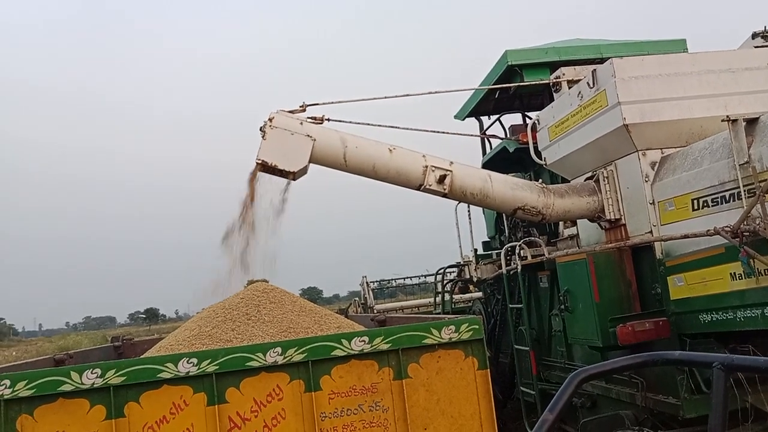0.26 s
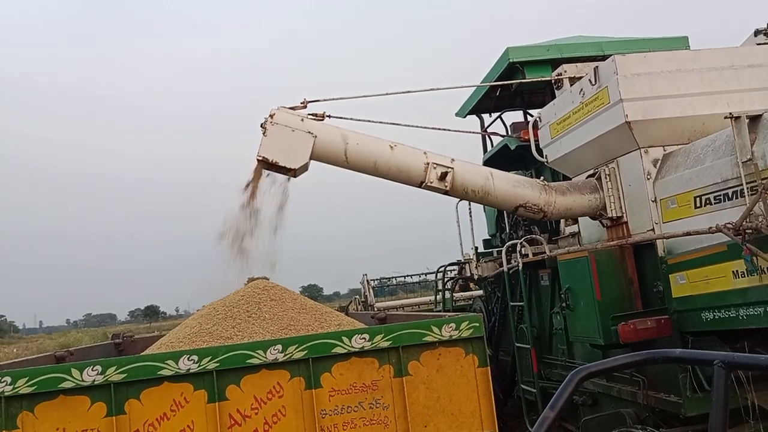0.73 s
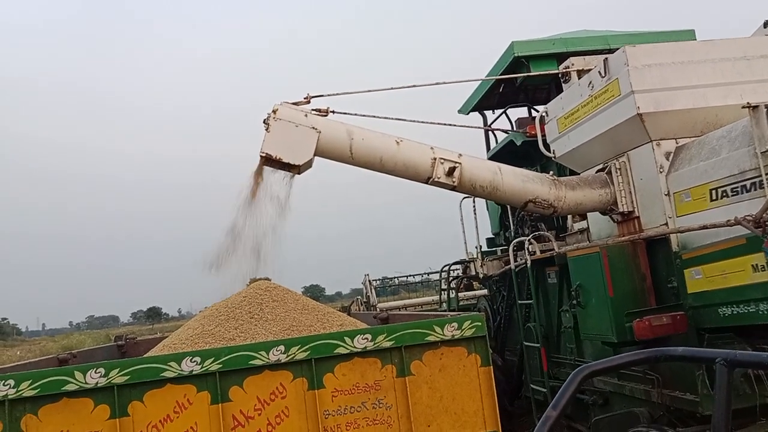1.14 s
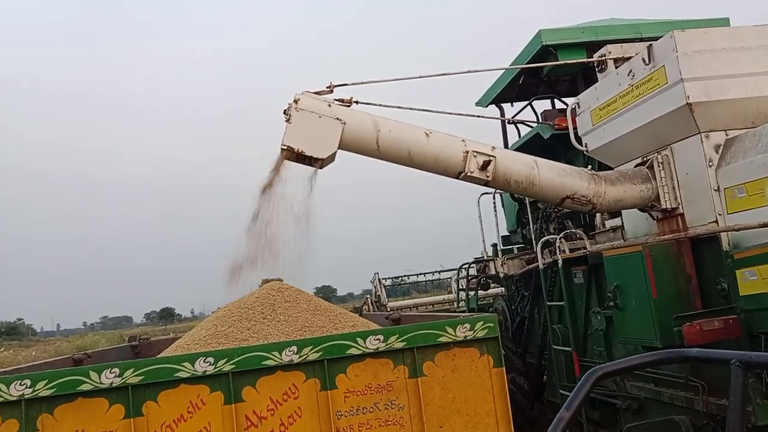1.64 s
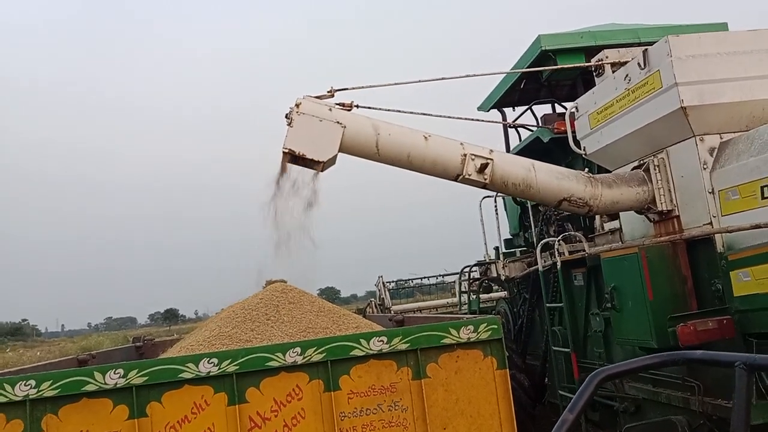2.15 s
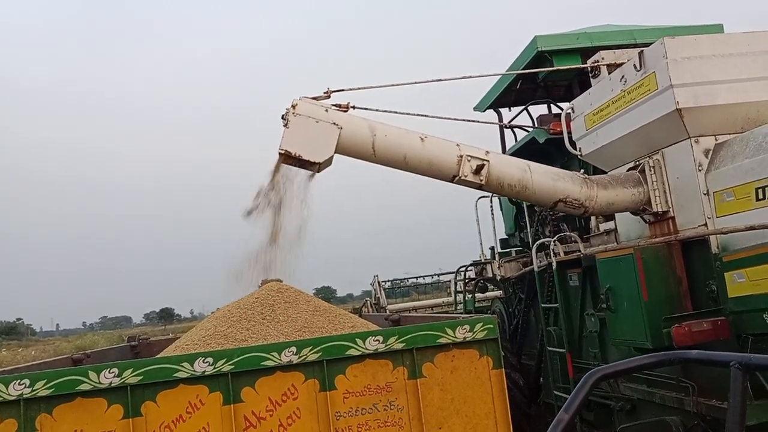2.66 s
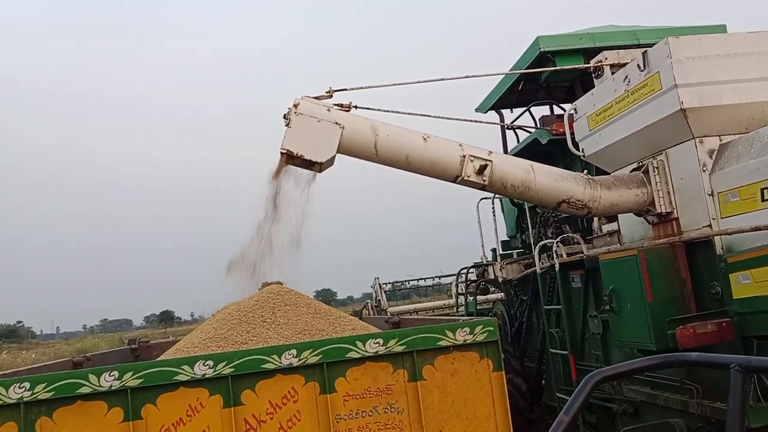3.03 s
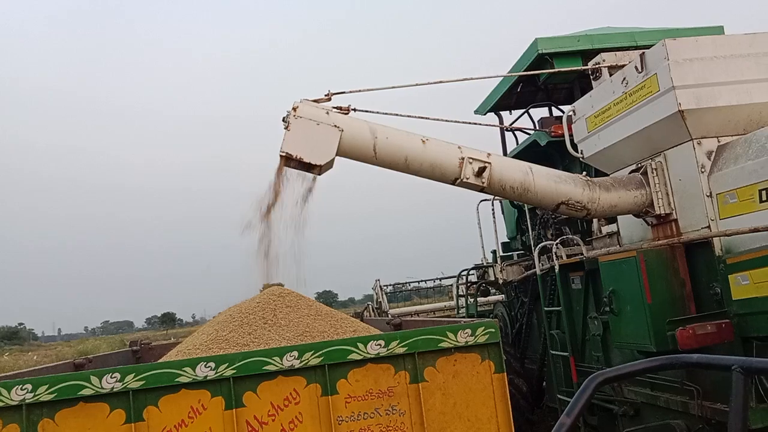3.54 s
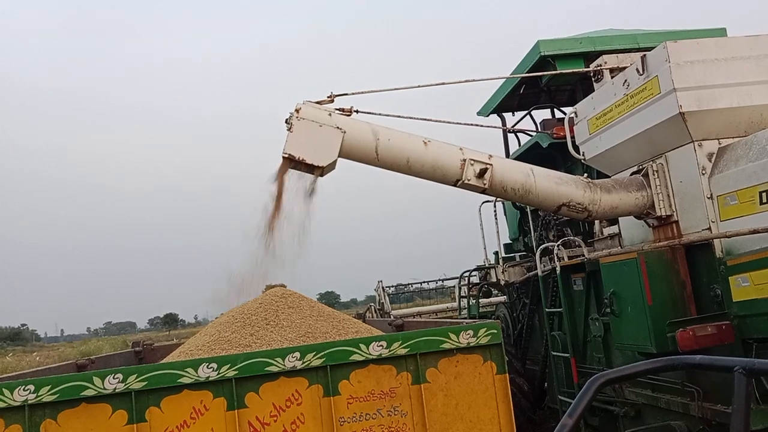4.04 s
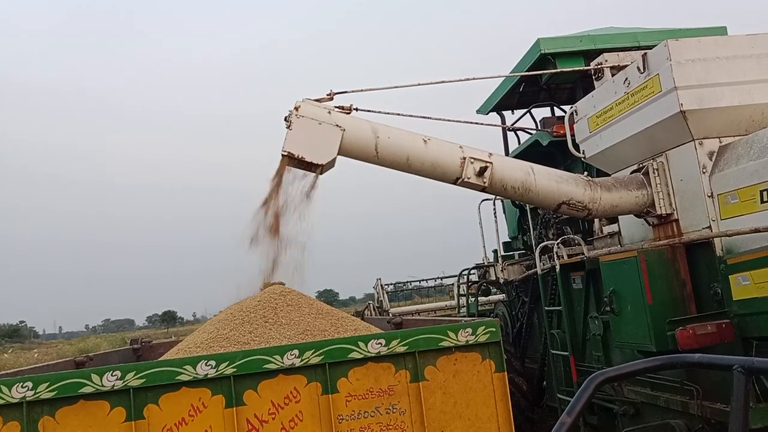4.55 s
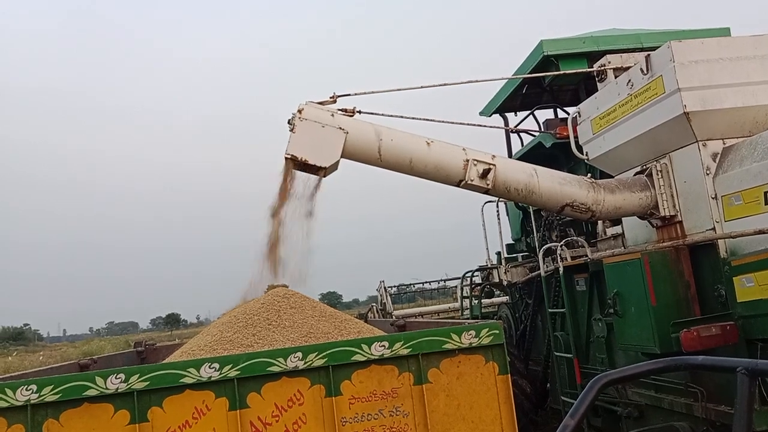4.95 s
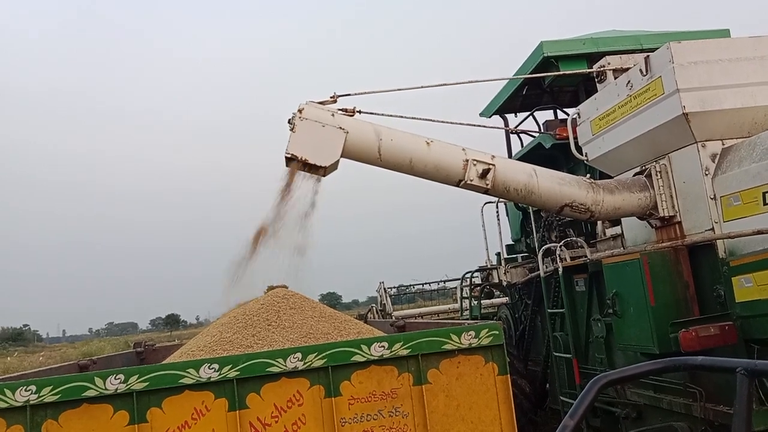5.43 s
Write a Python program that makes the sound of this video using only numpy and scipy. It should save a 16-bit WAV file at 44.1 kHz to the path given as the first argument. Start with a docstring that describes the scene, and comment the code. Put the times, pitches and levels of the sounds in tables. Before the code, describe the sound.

A combine harvester unloads grain into a trailer in an open field, heard from a few metres away for about 5.7 seconds. Its engine drones low throughout, a rough hum wavering slightly in pitch and level, with rumbling pipe and thin sheet-metal panels. Over it the auger rubs its steel tube about eight times a second, a quick dull rattle with a steady grainy scrape. Harder, briefly ringing knocks with small rebounds come irregularly: several from 0.6 to 1.4, more around 1.9 to 2.5 with the strongest near 2.4 and 2.5, a lull until 3.5, then scattered clanks, including 5.0 and a strong one at 5.5. Kernels pour in a dense, bright, fluttering hiss, swelling gently with each turn. Small spurts stand out near 3.0 and 3.9, and faint pings near 1.6 and 2.5. The microphone is fixed and dry, its peaks softened and upper midrange hollow. Everything continues to the end.

```python
"""A combine harvester stands in a field and unloads grain into a trailer, heard from one spot a few metres away.
Its drone is exhaust and shaft tones on one wavering speed, over random thumps through pipe and sheet metal.
The auger flight rubs its steel tube about eight times a second, and knocks hard at listed times: filtered
blows and chatter ring the tube's modes, over a steady scrape of dragged grain.
Kernels hiss down the spout and onto the heap as dense random ticks, with a few spurts and pings."""
import sys
import numpy as np
from scipy import signal
from scipy.fft import rfft, irfft, next_fast_len
from scipy.io import wavfile
from scipy.ndimage import uniform_filter1d

SR = 44100
rng = np.random.default_rng(int(sys.argv[2]) if len(sys.argv) > 2 else 0)


def dump_mix(stems):
    """Bounce the given channels to the path in sys.argv[1] as a 16-bit WAV at rate SR."""
    frames = np.atleast_2d(stems).T  # one column per channel
    limited = np.clip(frames, -1, 1)  # hard clip at full scale
    pcm = np.round(limited * 32767).astype(np.int16)
    wavfile.write(sys.argv[1], SR, pcm)


N = 250929
TIME = np.arange(N) / SR  # s

AUGER_HZ = 8.11  # turns a second
FIRST_RUB_S, RUB_S = 0.0655, 0.034  # the flight brushes the wall once a turn, for this long


def undb(db):
    """Decibels to gain."""
    return 10 ** (np.asarray(db) / 20)


def unit(x):
    """Scale to rms 1."""
    return x / np.sqrt(np.mean(x ** 2) + 1e-18)


def curve(table):
    """Join (s, value) rows by straight lines."""
    return np.interp(TIME, *np.transpose(table))


def walk(rate):
    """Smooth random wander with rms 1, from rate random steps a second averaged twice."""
    k = max(int(SR / rate), 1)
    steps = np.repeat(rng.standard_normal(N // k + 2), k)
    smooth = uniform_filter1d(uniform_filter1d(steps, k), k)
    return unit(smooth[:N])


def clumps(rate):
    """Unevenness of a lumpy stream, rms 1: clumps arrive at once, rate a second, and each trails off."""
    fade_s = 0.022
    arrivals = (rng.random(N) < rate / SR) * 1.0
    amount = signal.lfilter([1], [1, -np.exp(-1 / (fade_s * SR))], arrivals)
    return unit(amount - amount.mean())


def impacts(rate, scatter_db):
    """Random tiny blows of either sign and uneven size, rate a second, scaled to rms 1."""
    hit = rng.random(N) < rate / SR
    sign = np.sign(rng.standard_normal(N))
    size = undb(scatter_db * rng.standard_normal(N))
    return unit(hit * sign * size)


def burst(start, length, rise, fall):
    """Envelope that builds over rise (s), holds for about its length (s) and lets go as a power of age."""
    age = np.maximum(TIME - start, 0)
    return (1 - np.exp(-age / rise)) / np.sqrt(1 + (age / length) ** fall)


def colour(x, points):
    """Causal minimum-phase filter with a response through (Hz, dB) points on a log frequency axis."""
    size = next_fast_len(N + SR // 2, real=True) // 2 * 2
    hz, db = np.transpose(points)
    freq = np.maximum(np.arange(size // 2 + 1) * SR / size, 1)
    gain = undb(np.interp(np.log(freq), np.log(hz), db))
    # folding the cepstrum onto positive time makes the filter causal
    cepstrum = irfft(np.log(gain))
    cepstrum[1:size // 2] *= 2
    cepstrum[size // 2 + 1:] = 0
    response = np.exp(rfft(cepstrum))
    return irfft(rfft(x, size) * response)[:N]


def drone():
    """Exhaust and shaft tones share one wavering speed, over firing-pulsed thumps in the pipe and panels."""
    # exhaust note: multiple of the firing rate, level_db (within the hum)
    exhaust = [(1, -17.5), (2, -11.5), (3, -22), (4, -17)]
    # belt-driven shafts and fan: pitch_hz (before the wander), level_db (within the hum)
    shafts = [(44, -44), (57.3, -27), (86, -18.5), (142.5, -17.5), (153, -18.5), (194.5, -16)]
    # response of the exhaust pipe: freq_hz, gain_db
    pipe = [(22, -43.5), (36, -45), (56, -11.5), (72, -3), (85, 0.5), (102, 4), (120, -2.5), (150, -6),
            (300, -54), (2000, -71)]
    # response of the sheet-metal panels: freq_hz, gain_db
    body = [(40, -52.5), (100, -12.5), (128, -2.5), (150, 2.5), (178, -2), (197, 0.5), (240, -2),
            (300, -1.5), (314, -8.5), (330, -6), (360, -7.5), (485, -12.5), (560, -22.5), (5000, -59)]
    firing_hz = 82  # before the wander
    speed_wander, flutter_db = 0.00893, 3.5  # rms: fraction of speed, dB of each tone

    seconds_turned = np.cumsum(1 + speed_wander * walk(6)) / SR
    hum = np.zeros(N)
    for hz, db in [(k * firing_hz, db) for k, db in exhaust] + shafts:
        level = undb(db + flutter_db * walk(14))
        hum += level * np.sqrt(2) * np.sin(2 * np.pi * (hz * seconds_turned + rng.random()))

    firing = 1 + 0.087 * np.cos(2 * np.pi * firing_hz * seconds_turned)
    boom = unit(colour(firing * impacts(rate=1700, scatter_db=-2), pipe))
    panels = unit(colour(firing * impacts(rate=1800, scatter_db=0.5), body))
    # the whole drone throbs slightly with the auger
    throb_db = 0.35 * np.cos(2 * np.pi * AUGER_HZ * (TIME - 0.018))
    return undb(throb_db) * (undb(-1.5) * hum + undb(-9.5) * boom + undb(-0.5) * panels)


def auger(flow_db):
    """The flight's contacts clatter and ring the tube while it drags the grain along."""
    # dull clatter of a contact: freq_hz, gain_db
    clatter_response = [(100, -46), (550, -11.5), (720, -3.5), (1000, -2.5), (1250, 2.5), (1550, -12),
                        (2300, -15), (3200, -21), (4200, -19), (6000, -24.5), (10000, -64)]
    # response of grain dragged along the tube: freq_hz, gain_db
    scrape_response = [(250, -9.5), (480, 2.5), (570, -3), (720, 3), (1000, 1), (1320, -1.5), (1520, -9.5),
                       (1750, -10.5), (2000, -7.5), (2600, -9.5), (2900, -16), (3300, -16), (4200, -37.5),
                       (7000, -38)]
    scrape_db = -24.5  # gain at flow 0 dB
    scrape_per_flow = 0.94  # dB of scraping for each dB of flow

    blows, chatter = contacts()
    ringing = tube(undb(-8) * blows + undb(-13) * chatter)
    clatter = undb(1.5) * colour(undb(-3.5) * blows + chatter, clatter_response)

    drag = unit(colour(impacts(rate=2200, scatter_db=2.5), scrape_response))
    rattle = tube(impacts(rate=700, scatter_db=1.5))
    scrape = undb(-0.76) * drag + undb(-9) * rattle
    scrape_gain = undb(scrape_db + scrape_per_flow * flow_db + 1.0 * clumps(rate=52))
    return ringing + clatter + scrape_gain * scrape


def contacts():
    """Forces of the flight on the wall: hard rebounding blows, and chatter in each rub or knock."""
    # hard knocks of the flight on its tube: start_s, level_db (of the chatter's force), chatter_s
    knocks = [(.563, -14.5, .028), (.677, -12.5, 0.014), (0.887, -12, .014), (1.05, -12.5, 0.022),
              (1.304, -7, 0.015), (1.438, -11, .041), (1.917, -12, 0.044), (2.049, -9.5, 0.014),
              (2.283, -10, 0.027), (2.423, -4.5, .02), (2.54, -5, 0.023), (3.516, -11.5, 0.033),
              (3.637, -9.5, .02), (3.756, -10, 0.018), (4.136, -12.5, .027), (4.495, -13, .025),
              (4.746, -11.5, .035), (4.888, -14, 0.035), (5.015, -8, .018), (5.327, -13, 0.049),
              (5.512, -5.5, 0.032)]
    rub_db, rub_scatter_db, rub_jitter_s = -18.5, 0.1, 0.004
    contact = dict(rise=0.00042, fall=3.1)  # s, exponent
    strike_db = 19.5  # force of the first blow, re the knock's level
    bounce_s, bounce_db = 0.011, -4  # mean gap and weakening of each of two rebounds

    pressure, blows = np.zeros(N), np.zeros(N)
    for turn_s in np.arange(FIRST_RUB_S, N / SR, 1 / AUGER_HZ):
        late, strong = rng.standard_normal(2)
        rub = burst(turn_s + rub_jitter_s * late, RUB_S, **contact)
        pressure = np.maximum(pressure, undb(rub_db + rub_scatter_db * strong) * rub)

    for start, db, length in knocks:
        pressure = np.maximum(pressure, undb(db) * burst(start, length, **contact))
        gaps = bounce_s * (0.5 + rng.random(2))
        for k, at in enumerate([start, start + gaps[0], start + gaps.sum()]):
            blows[int(at * SR)] = undb(db + strike_db + k * bounce_db)
    return blows, pressure * impacts(rate=2400, scatter_db=0.5)


def tube(x):
    """Ring the steel tube's decaying modes; their summed response has unit energy."""
    # modes: pitch_hz, t60_s (time to fall 60 dB), level_db (relative, evened out for decay time)
    modes = [(633, 0.2, -4.5), (711.4, 0.11, 1), (822, 0.078, -1.5), (898, 0.18, 1.5), (988, 0.078, 4),
             (1091, 0.094, 3), (1248, 0.098, -5.5), (1320, 0.11, 2), (1380, 0.29, -8), (1703, 0.14, -9.5),
             (1814, 0.12, -11), (1973, 0.041, -4), (2257, 0.18, -9), (2504, 0.05, -5), (2775, 0.041, -14),
             (3105, 0.04, -8.5), (3240, 0.055, -17.5), (3980, 0.13, -36)]
    t = TIME[:SR // 3]
    ring = np.zeros(len(t))
    for k, (hz, t60, db) in enumerate(modes):
        decay = undb(db - 60 * t / t60) / np.sqrt(t60)
        ring += (-1) ** k * decay * np.sin(2 * np.pi * hz * t)
    return signal.fftconvolve(x, ring / np.linalg.norm(ring))[:N]


def grain(flow_db):
    """Thousands of kernel ticks a second hiss, flutter, swell each auger turn and shake with the spout."""
    # response of kernels sliding and landing: freq_hz, gain_db
    hiss = [(3000, -26), (5500, -8.5), (6300, -10), (6700, -2.5), (7700, 1.5), (8600, 0), (9350, -14.5),
            (9900, -12), (10700, -11.5), (11450, -15), (12200, -9.5), (13050, -10.5), (13900, -18.5),
            (15400, -13.5)]
    # response of a kernel pinging on steel: freq_hz, gain_db
    ping = [(6000, -19), (9500, -2), (10600, 2), (11600, -7), (13100, -4), (14000, -6), (15400, -3)]
    # clumps of kernels spurting down the spout: start_s, level_db (before spray and ping gains), length_s
    spurt_times = [(0.702, -30.5, .033), (0.797, -29.5, 0.034), (2.966, -25, 0.029), (3.859, -26.5, 0.012),
                   (4.78, -31, 0.038), (5.433, -28.5, 0.014)]
    # stray kernels pinging on bare steel: start_s, level_db
    stray_times = [(1.631, -32), (1.704, -36), (2.473, -34), (3.53, -37)]
    hiss_db, shake_hz = -32.5, 43.1  # hiss gain at flow 0 dB
    stray_s = 0.013
    edge = dict(rise=0.0016, fall=12)  # s, exponent

    shake = 1 + 0.06 * np.sin(2 * np.pi * shake_hz * TIME)
    flutter_db = 0.75 * clumps(rate=60)
    # the stream is fullest as each regular rub ends
    swell_db = 0.48 * np.cos(2 * np.pi * AUGER_HZ * (TIME - FIRST_RUB_S - RUB_S))
    ticks = unit(colour(impacts(rate=14000, scatter_db=2.5), hiss))
    stream = undb(hiss_db + flow_db + flutter_db + swell_db) * shake * ticks

    spray = undb(-1.0) * unit(colour(impacts(rate=4400, scatter_db=2), hiss))
    pings = unit(colour(impacts(rate=2700, scatter_db=2.0), ping))
    spurts = sum(undb(db) * burst(start, length, **edge) for start, db, length in spurt_times)
    strays = sum(undb(db) * burst(start, stray_s, **edge) for start, db in stray_times)
    return stream + spurts * (spray + undb(-15) * pings) + strays * pings


def scene():
    """Machine, auger and grain heard from one spot."""
    # uneven level of the drone: time_s, gain_db
    drone_level = [(0, -16.5), (.43, -18.5), (.84, -14.5), (1.1, -16.5), (1.55, -17), (1.68, -15.8),
                   (2.0, -15), (2.98, -18), (3.3, -17.5), (3.5, -16), (4.3, -17), (4.8, -16), (5.69, -17)]
    # grain passing through the auger: time_s, flow_db
    flow = [(0, 1.5), (.35, -1.8), (.67, 1.3), (.95, -2.2), (1.62, 0.4), (2.03, -.4), (2.45, -0.3),
            (2.88, -1), (3.5, 0.1), (4.9, 0), (5.69, -2)]
    flow_db = curve(flow)
    machine = undb(curve(drone_level)) * drone()
    return (machine + auger(flow_db) + grain(flow_db))[None]


def record(dry):
    """The microphone rounds the peaks, loses a wide band near 5 kHz and cuts the top."""
    # wide, deep deaf band of the microphone, about 4.2 to 5.6 kHz: freq_hz, gain_db
    deaf_band = [(3500, 0), (4150, -7.5), (4380, -22.5), (4600, -46), (5000, -66), (5230, -17),
                 (5550, -16.5), (5900, 0.5)]
    top_hz = 15500
    rounded = np.tanh(0.5 * dry[0]) / 0.5
    sound = colour(rounded, deaf_band)
    top_cut = signal.ellip(16, 0.2, 90, top_hz, fs=SR, output="sos")  # order, ripple dB, stop dB
    return signal.sosfilt(top_cut, sound)[None]


dry = scene()
out = record(dry)
dump_mix(out)
```